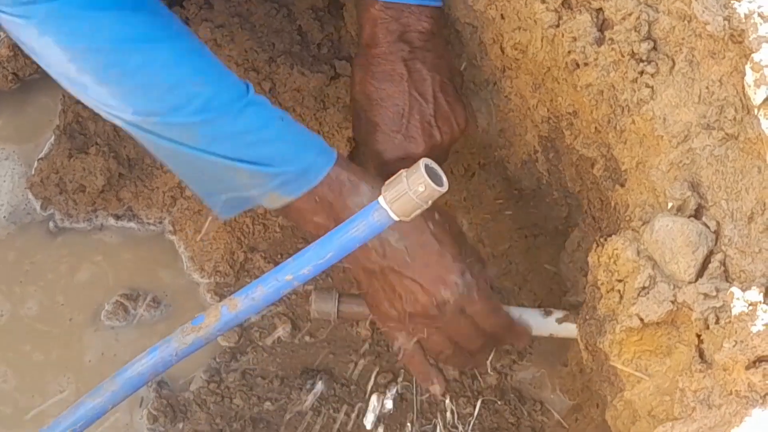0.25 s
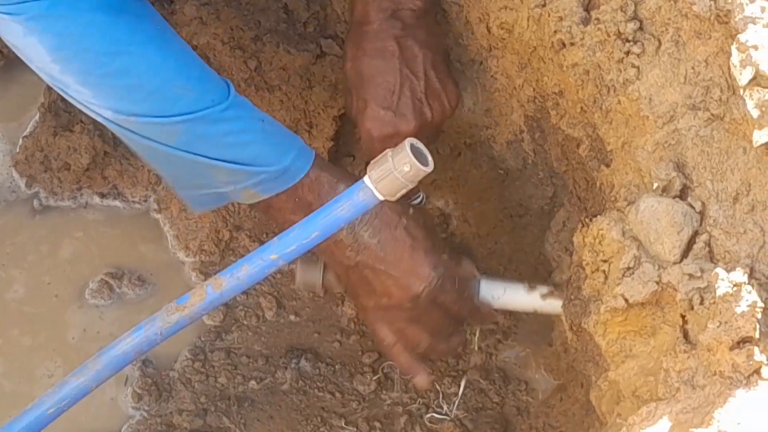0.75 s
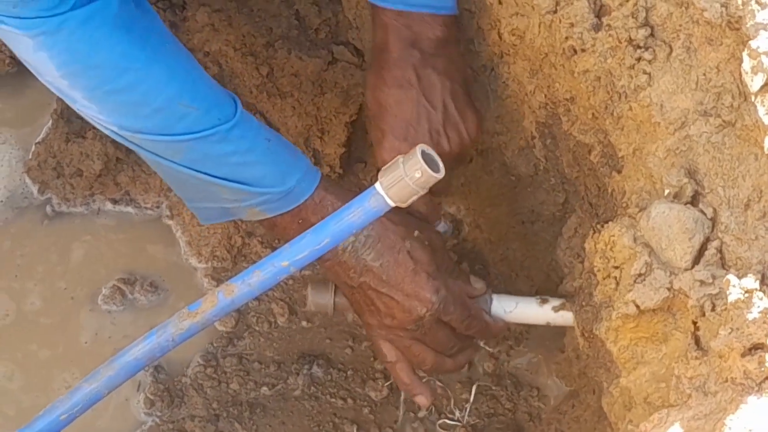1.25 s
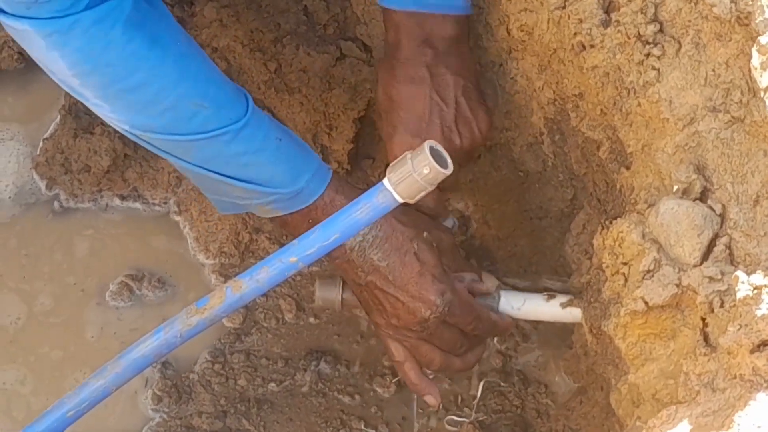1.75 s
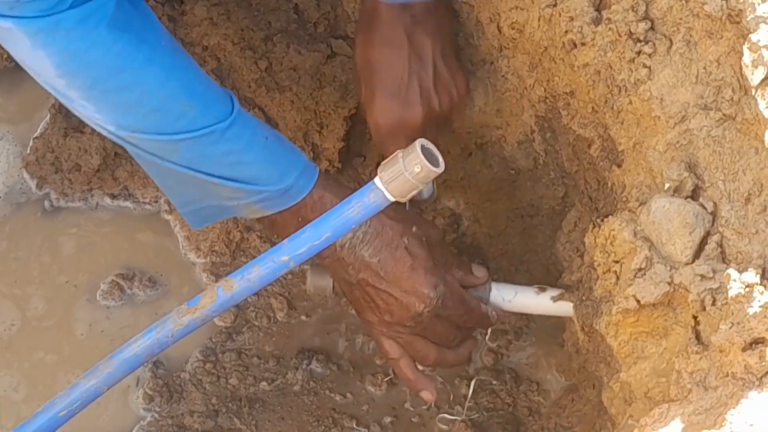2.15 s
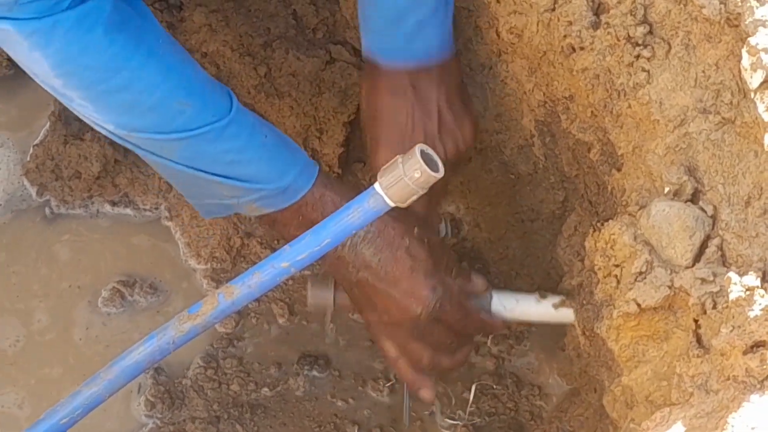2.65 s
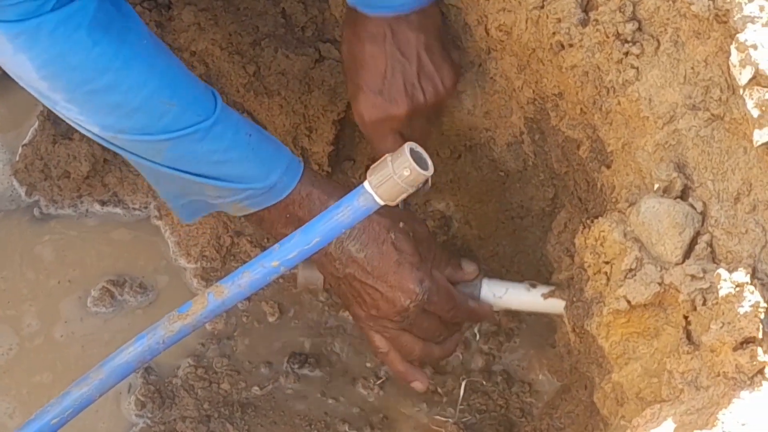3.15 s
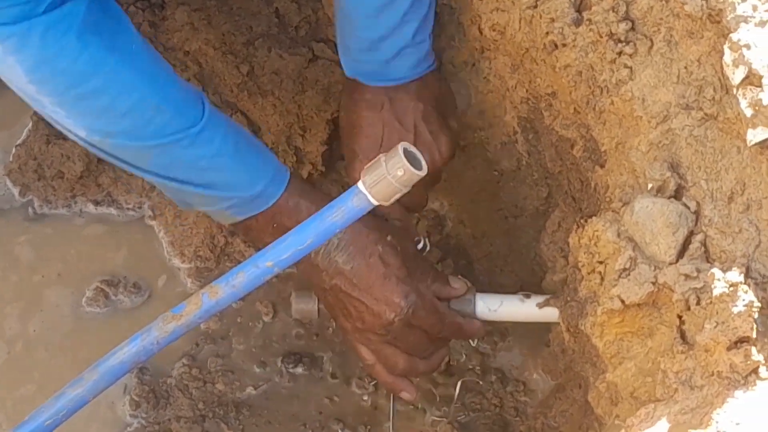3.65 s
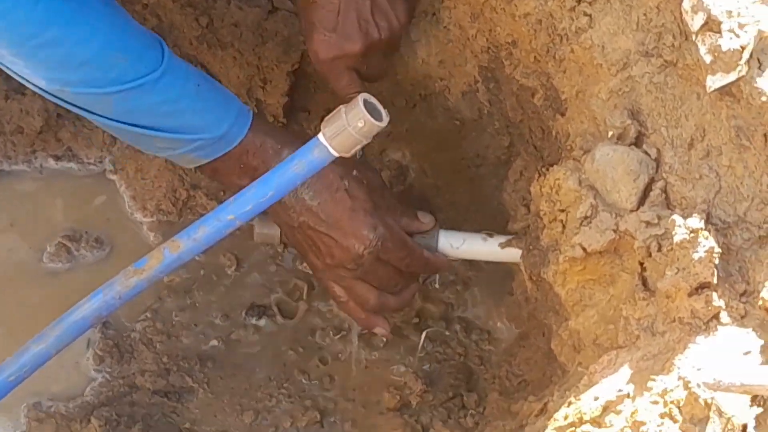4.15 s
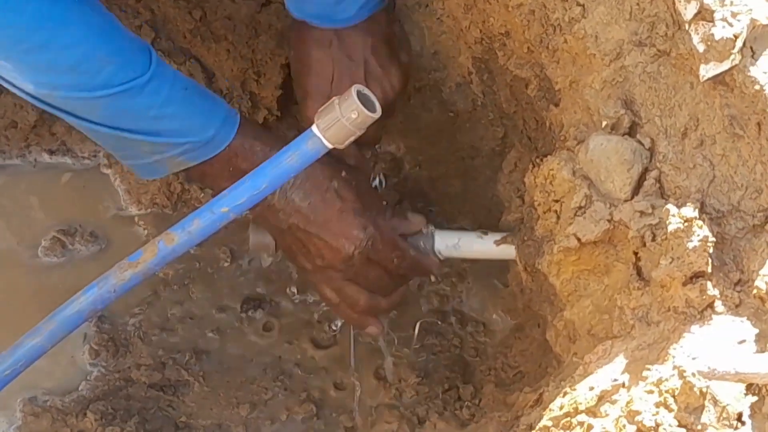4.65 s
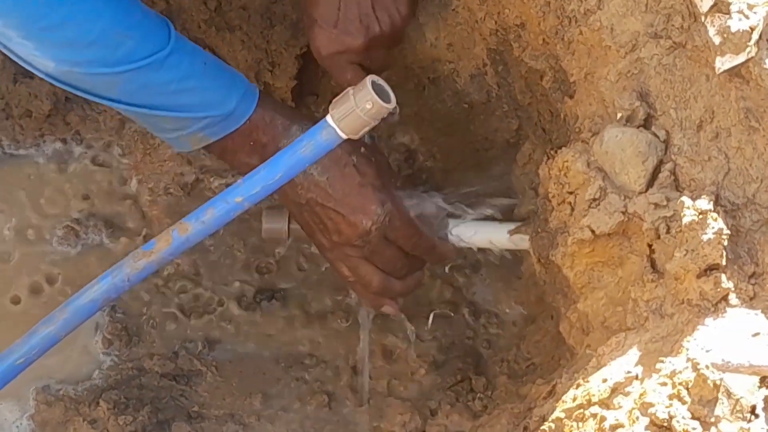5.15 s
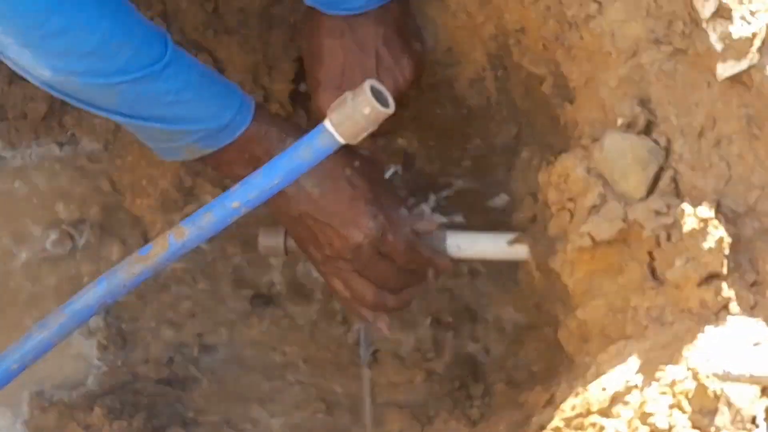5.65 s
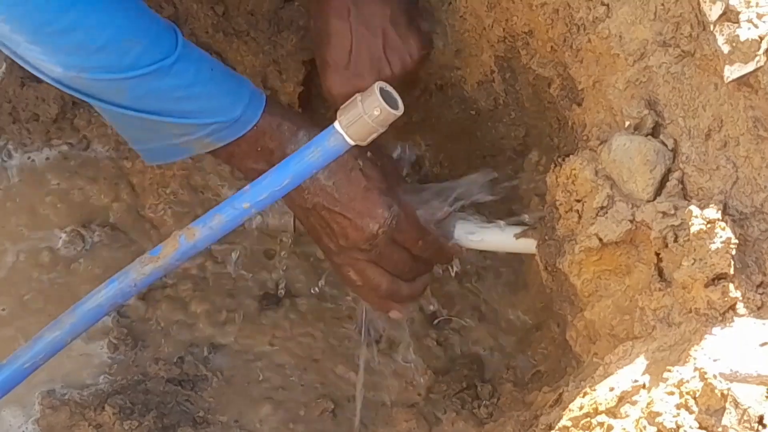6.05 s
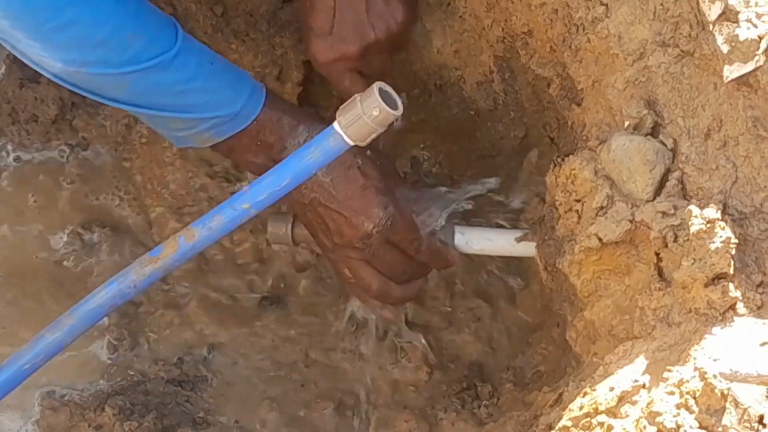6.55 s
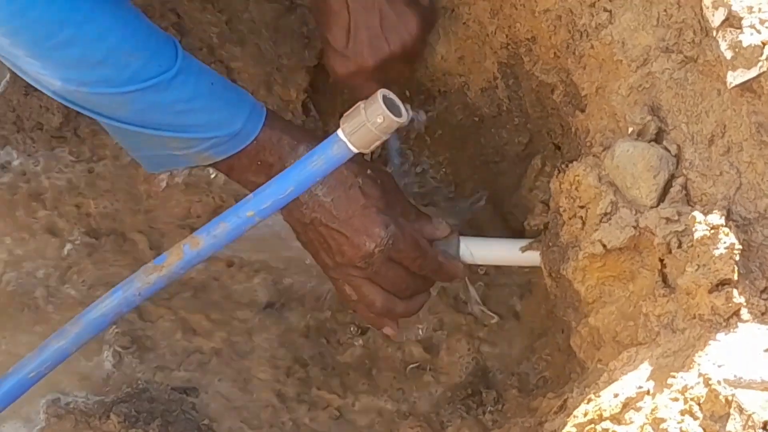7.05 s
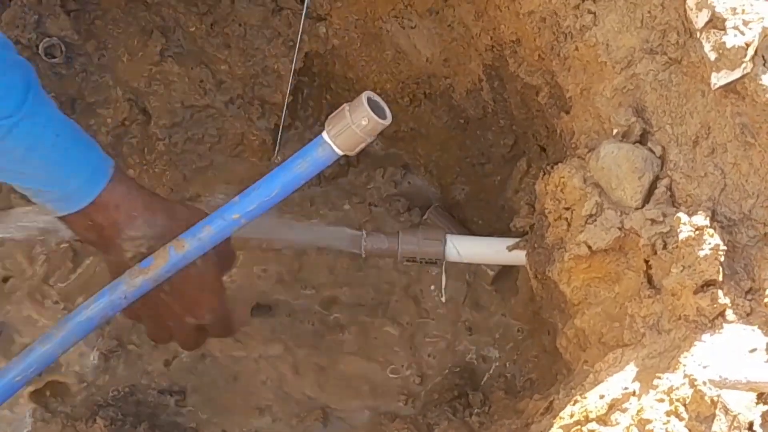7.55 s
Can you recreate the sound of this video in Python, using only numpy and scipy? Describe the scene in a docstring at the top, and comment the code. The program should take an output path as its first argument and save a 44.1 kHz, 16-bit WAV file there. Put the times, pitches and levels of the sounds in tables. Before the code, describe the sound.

Short scratchy saw strokes on a hollow plastic pipe give way to hissing, pattering water, with low wind thumps on the microphone.

```python
"""A muddy pit with earth walls: a bare hacksaw blade cuts a plastic water pipe, its leaking end held by hand.
Short nicks start the cut, then push and pull strokes excite the pipe's resonances and rasp as noise.
Once the blade breaks through, noise bursts and bubbles make spray, patter and run-off; wet teeth are quieter.
At last the hand lets go and a jet splashes into the puddle. Gusts of low noise buffet the microphone's
left port, later mostly its right. Levels in the tables are relative, ahead of the trims in scene()."""
import sys
import numpy as np
from scipy import signal
from scipy.fft import rfft, irfft
from scipy.io import wavfile
from scipy.ndimage import uniform_filter1d

SR = 44100
rng = np.random.default_rng(int(sys.argv[2]) if len(sys.argv) > 2 else 0)


def digitize_waveform(pressure):
    """Quantize a signal to 16-bit integers and store it at the path in sys.argv[1].

    Rows of a 2-D input are taken as channels; values are limited to [-1, 1].
    """
    field = np.atleast_2d(pressure).T
    bounded = np.clip(field, -1, 1)
    quanta = np.round(bounded * 32767).astype(np.int16)
    wavfile.write(sys.argv[1], SR, quanta)


N = 344862  # samples

# bending modes of the water-filled pipe: pitch_hz, width_hz, level_db
PIPE_BENDING_MODES = [(356, 39, 0.5), (474, 31.5, 2.5), (584.4, 36, 3.5), (718, 24.7, 2), (832, 55, 1),
                      (1007, 69, 3), (1127, 60, 3.5), (1339, 121, 0)]
# wall modes of the pipe: pitch_hz, width_hz, level_db
PIPE_WALL_MODES = [(1860, 102, 2), (2356, 102, 9.5), (2873, 186, 4.5), (3750, 380, -1.5)]
# spectrum of the rasp: frequency_hz, level_db
RASP_SPECTRUM = [(1500, -47), (3200, 1.5), (4200, 1), (5500, 4.5), (7000, -1.5), (8400, 4), (9800, -1),
                 (15500, -3.5)]


def saw(body_db, bite_db, chip_s, brighten_db, dulling_db):
    """Each tooth bends the pipe, then tears a chip that rings the wall and rasps."""
    out = np.zeros((2, N))
    soft = signal.butter(3, 1500, fs=SR, output="sos")
    for start_s, length_s, attack, rate, speedup, rough, body, bite, rasp in cuts():
        # a smooth stroke skips evenly from tooth to tooth, a rough one catches at random
        catches, pressure = teeth(length_s, attack, rate, speedup, jitter=0.191 * rough,
                                  uneven_db=5.05 * np.sqrt(rough), chatter_db=1.5, release_s=0.0042)
        size = len(catches)
        progress = np.minimum(np.arange(size) / SR / length_s, 1)

        # a slow blade pushes longer on each tooth, so it favours the low modes
        slant = brighten_db * np.log2(rate / 500)
        modes = [(hz, width, db + slant * np.log2(hz / 800)) for hz, width, db in PIPE_BENDING_MODES]
        scrape = rough * unit(pair(0.82, size) * pressure)
        bend = signal.sosfilt(soft, shifting(unit(catches) + scrape, modes, progress))

        # a rough stroke tears hardest at first, before chips clog the teeth
        chips = catches * undb(dulling_db * rough ** 2 * progress)
        tearing = fade(chips, chip_s)
        wall_drive = unit(chips) + unit(tearing * pair(0.6, size))
        wall = shifting(wall_drive, PIPE_WALL_MODES, progress)
        rasping = colour(tearing * pair(0.17, size), RASP_SPECTRUM)

        stroke = unit(bend) * undb(body + body_db)
        stroke = stroke + unit(wall) * undb(bite + bite_db)
        stroke = stroke + unit(rasping) * undb(rasp)
        # levels hold for the length of the stroke, not for the longer buffer
        add(out, start_s, stroke * np.sqrt(length_s * SR / size))
    return out


PUSH, PULL = 1, -1
# blade strokes; a push that snags goes on in a second row:
# start_s, length_s, strength_db, rate_teeth_per_s, direction
BLADE_STROKES = [(1.784, 0.038, -41, 500, PUSH), (1.929, 0.056, -35, 700, PULL),
                 (2.107, 0.066, -37.5, 510, PUSH), (2.261, 0.063, -37, 620, PULL),
                 (2.436, 0.078, -39, 554, PUSH), (2.574, 0.078, -38, 574, PULL),
                 (2.768, 0.065, -36, 580, PUSH), (2.914, 0.067, -31, 630, PULL),
                 (3.107, 0.015, -24.5, 635, PUSH), (3.124, 0.019, -30.5, 600, PUSH),
                 (3.158, 0.016, -30.5, 530, PUSH), (3.237, 0.049, -30, 558, PULL),
                 (3.411, 0.0069, -27.5, 500, PUSH), (3.435, 0.024, -24, 520, PUSH),
                 (3.461, 0.039, -33.5, 570, PUSH), (3.563, 0.066, -29.5, 622, PULL),
                 (3.743, 0.06, -31.5, 410, PUSH), (3.806, 0.02, -34.5, 530, PUSH),
                 (3.885, 0.05, -27, 630, PULL), (4.054, 0.043, -28.5, 466, PUSH),
                 (4.111, 0.022, -29, 534, PUSH), (4.208, 0.056, -35.5, 570, PULL),
                 (4.379, 0.078, -33.5, 490, PUSH), (4.514, 0.048, -27.5, 650, PULL),
                 (4.716, 0.044, -33, 405, PUSH), (4.852, 0.043, -40, 575, PULL),
                 (5.031, 0.069, -36, 415, PUSH), (5.177, 0.055, -35.5, 540, PULL),
                 (5.341, 0.072, -33.5, 350, PUSH), (5.538, 0.033, -47.5, 340, PULL),
                 (5.705, 0.076, -40.5, 377, PUSH), (5.912, 0.031, -42.5, 470, PULL),
                 (6.424, 0.049, -42, 340, PUSH)]
# the tooth tips skip on the pipe and nick it: start_s, length_s, scratch_db, knock_db (on the pipe)
TOOTH_NICKS = [(0.384, 0.064, -55.5, -50), (0.524, 0.019, -49.5, -50), (0.675, 0.0083, -51.5, -41.5),
               (0.742, 0.017, -44, -33.5), (0.874, 0.011, -49, -68), (0.978, 0.007, -40.5, -70),
               (1.102, 0.0043, -41.5, -52), (1.247, 0.014, -45, -45.5), (1.434, 0.0065, -43.5, -46.5),
               (1.638, 0.0073, -49, -43.5), (2.009, 0.013, -49, -45), (2.192, 0.0079, -51.5, -41),
               (2.686, 0.0083, -41, -50.5), (2.826, 0.004, -34.5, -31), (3.002, 0.0087, -42.5, -38),
               (3.087, 0.0026, -43, -25), (3.224, 0.0042, -40, -47), (3.311, 0.014, -40, -42.5),
               (3.381, 0.0049, -39.5, -57), (4.69, 0.018, -53, -40), (5.157, 0.0067, -32.5, -45)]
# pulls run more evenly once the kerf guides them, then less so: time_s, roughness (0-1)
PULL_ROUGHNESS_CURVE = [(2.6, .85), (3.5, .37), (4.5, .4), (5.3, .7)]
BREAKTHROUGH_S, FLOOD_S = 4.205, 0.23  # the blade reaches the water, which then fills the kerf
# share by which the blade gains speed over a stroke; share of a push's roughness that water takes away
PUSH_SPEEDUP, PULL_SPEEDUP, WET_SMOOTHING = .12, .34, .2
# share of a stroke over which pressure builds: a push bites at once, a pull swells
PUSH_ATTACK, PULL_ATTACK, NICK_ATTACK = 0.051, 0.08, 0.38
# ring of the pipe wall, against the stroke's strength
BITE_DB, PUSH_BITE_DB, WET_BITE_DB = -8.5, 3, -6.5
# rasp of a stroke of usual strength, and its growth in dB per dB of strength
USUAL_DB, RASP_DB, RASP_GROWTH, PUSH_RASP_DB, WET_RASP_DB = -33.5, -41, 0.64, 2, -8.5
NICK_TEETH_PER_S, NICK_BITE_DB = 500, -3.5


def cuts():
    """Every touch of the blade: pushes bite harder, pulls gain more speed, wet teeth are quieter.
    Yields start_s, length_s, attack, teeth per second, speed-up, roughness, body_db, bite_db, rasp_db."""
    for start_s, length_s, db, rate, direction in BLADE_STROKES:
        wet = np.clip((start_s - BREAKTHROUGH_S) / FLOOD_S, 0, 1)
        bite = db + BITE_DB + PUSH_BITE_DB * direction + WET_BITE_DB * wet
        rasp = RASP_DB + RASP_GROWTH * (db - USUAL_DB) + PUSH_RASP_DB * direction + WET_RASP_DB * wet
        if direction == PUSH:
            attack, speedup, rough = PUSH_ATTACK, PUSH_SPEEDUP, 1 - WET_SMOOTHING * wet
        else:
            attack, speedup = PULL_ATTACK, PULL_SPEEDUP
            rough = np.interp(start_s, *np.transpose(PULL_ROUGHNESS_CURVE))
        yield start_s, length_s, attack, rate, speedup, rough, db, bite, rasp
    for start_s, length_s, scratch, knock in TOOTH_NICKS:
        bite = scratch + NICK_BITE_DB + 0.37 * (knock - scratch)
        yield start_s, length_s, NICK_ATTACK, NICK_TEETH_PER_S, 0, 1, knock, bite, scratch


SEATING_S = .003  # time that the teeth need to seat themselves, however short the touch


def teeth(length_s, attack, rate, speedup, jitter, uneven_db, chatter_db, release_s):
    """The blade gathers speed and its teeth catch unevenly; returns the catches and the blade's pressure."""
    t = np.arange(SR // 5) / SR
    chance = rng.standard_normal((160, 2))
    speed = rate * (1 + speedup * (np.minimum(t / length_s, 1) - .5))
    teeth_passed = np.cumsum(speed) / SR
    tooth_places = np.cumsum(np.exp(jitter * chance[:, 0])) - 1
    at = np.searchsorted(teeth_passed, tooth_places)
    catches = np.bincount(at, undb(uneven_db * chance[:, 1]), len(t) + 1)[:len(t)]
    rise = np.minimum(t / (SEATING_S + attack * length_s), 1)
    fall = np.exp(-np.maximum(t - length_s * 0.95, 0) / (release_s + 0.11 * length_s))
    # the thin blade chatters in the kerf
    pressure = rise * fall * undb(chatter_db * walk(103.4, len(t)))
    return catches * pressure, pressure


# each spot on the wall favours other modes, and the hand's changing grip detunes them by a small share
STROKE_COLOUR_DB, GRIP_DETUNE = 2.8, .014


def shifting(x, modes, progress):
    """The teeth travel across the wall, so other modes ring most at the end of a stroke than at its start."""
    out = 0
    for share in (1 - progress, progress):
        grip = 1 + GRIP_DETUNE * rng.standard_normal()
        spot = [(hz * grip, width, db + STROKE_COLOUR_DB * rng.standard_normal()) for hz, width, db in modes]
        out = out + ring(x * share, spot)
    return out


# spectra of spray, of a pinhole leak, of droplets on mud and of the puddle: frequency_hz, level_db
MIST_SPECTRUM = [(2500, -6), (5000, -3.5), (7000, 3), (10000, 3), (15500, 3)]
PINHOLE_SPECTRUM = [(5000, -15), (8500, -34), (11000, 4), (15500, 9)]
PATTER_SPECTRUM = [(700, -2), (1250, -13), (2050, 1), (3100, 0.5), (5400, 6), (6600, 3.5), (9000, -10)]
GURGLE_SPECTRUM = [(200, 0.5), (320, 0.5), (470, 2), (614, 4.5), (880, -1.5), (1110, 2), (1270, -2.5),
                   (1520, 1), (2500, -15)]
# the cut pipe rings under the spray: pitch_hz, width_hz, level_db
SPRAY_RING_MODES = [(2020, 130, -3.5), (2360, 99, -4)]
FIZZ, GLUG = .85, .8  # bubbles against the plain splashing, in the patter and in the puddle
# unevenness of the droplets in mist and fine patter, and of the coarse jet's flow
MIST_SPREAD_DB, PATTER_SPREAD_DB, SPUTTER_DB = 3.6, 6.5, 3
FULL_FLOW_DB = -44.5  # reference flow: mist below this hisses higher


def water(mist_db, patter_db, gurgle_db):
    """Spray hisses at the kerf, its droplets patter on wet mud and the run-off churns the puddle."""
    mist, patter, gurgle = outflow()
    # where there is little mist the water comes as a solid jet: fewer, fatter drops that trap bubbles
    coarse = np.clip(0.21 + (patter - mist) / 10, 0, 1)
    sputter = SPUTTER_DB * coarse * walk(35)  # a coarse jet breaks up, fine spray is steady

    spray = impacts(rate=6000, spread_db=MIST_SPREAD_DB, smear_s=0.0014, likeness=0.035)
    thin = np.clip((FULL_FLOW_DB - mist) / 20, 0, 1)  # a small leak hisses higher
    hiss = unit(colour(spray, MIST_SPECTRUM)) + 0.73 * thin * unit(colour(pair(0), PINHOLE_SPECTRUM))
    hiss_level = mist + mist_db + sputter / 2 + 5.1 * thin * walk(26.8)

    fine = impacts(rate=16000, spread_db=PATTER_SPREAD_DB, smear_s=0.0034, likeness=0.84)
    fat = impacts(rate=760, spread_db=8.5, smear_s=0.016, likeness=0.11)
    fat = fat + FIZZ * bubbles(1390, 6040, cycles=34, spread_db=3.0, count=5600)
    splats = colour(np.sqrt(1 - coarse) * fine + np.sqrt(coarse) * unit(fat), PATTER_SPECTRUM)
    splats = splats + sum(ring(splats, [mode]) for mode in SPRAY_RING_MODES)

    churn = impacts(rate=900, spread_db=4.0, smear_s=0.0035, likeness=0.064)
    glugs = bubbles(311, 1740, cycles=14.4, spread_db=4.5, count=3600)
    puddle = colour(churn + GLUG * coarse * glugs, GURGLE_SPECTRUM)

    return (hiss * undb(hiss_level) + unit(splats) * undb(patter + patter_db + sputter)
            + unit(puddle) * undb(gurgle + gurgle_db))


# flow of the leak: time_s, level_db
LEAK_FLOW = [(0.0, -65.5), (0.63, -60.5), (0.94, -61.5), (1.41, -56.5), (2.46, -56), (2.94, -60),
             (3.61, -55.5), (4.31, -55.5), (4.55, -50.5), (4.75, -46), (5.05, -42.5), (5.8, -37),
             (6.34, -37.5), (7.03, -45.5), (7.82, -48.5)]
# the flow of water surges or falters for a moment: start_s, length_s, change_db
FLOW_SURGES = [(0.116, 0.14, 9.5), (1.264, 0.16, 5), (1.852, 0.078, -8), (4.882, 0.16, 2.5),
               (6.657, 0.12, 5.5), (6.918, 0.045, 6), (7.135, 0.026, -10), (7.44, 0.076, 4.5),
               (7.682, 0.022, -11), (7.712, 0.029, 3.5), (7.787, 0.029, 6.5)]
MIST_GROWTH, GURGLE_GROWTH = 0.97, 0.28  # mist and gurgle grow more slowly than the flow, in dB per dB
SURGE_PATTER = 0.77  # a surge is mostly mist; this share of its change in dB reaches the ground
LOOSEN_S, LULL_DB = 7.07, -15  # the grip loosens and less run-off reaches the puddle
RELEASE_S, JET_PATTER_DB, JET_MIST_DB = 7.17, 3, -2.5  # the hand lets go: the jet hits mud, with less mist
JET_LANDS_S, JET_SPLASH_DB, JET_GURGLE_DB = 7.46, 1.5, -3.5  # the jet reaches the puddle


def outflow():
    """Levels of mist, patter and gurgle in dB: all follow the flow, and the free jet patters harder."""
    flow = np.interp(np.arange(N) / SR, *np.transpose(LEAK_FLOW))
    surge = sum(db * swell(start_s, length_s, attack_s=0.013, release_s=0.0033)
                for start_s, length_s, db in FLOW_SURGES)
    loose, jet, landed = (swell(start_s, N / SR, attack_s=0.0044, release_s=.03)
                          for start_s in (LOOSEN_S, RELEASE_S, JET_LANDS_S))
    mist = FULL_FLOW_DB + MIST_GROWTH * (flow - FULL_FLOW_DB) + surge + JET_MIST_DB * jet
    patter = flow + SURGE_PATTER * surge + JET_PATTER_DB * jet + JET_SPLASH_DB * landed
    gurgle = FULL_FLOW_DB + GURGLE_GROWTH * (flow - FULL_FLOW_DB)
    gurgle = gurgle + JET_GURGLE_DB * landed + LULL_DB * (loose - landed)
    return mist, patter, gurgle


def wander(x, rate, depth_db):
    """Each third of an octave of the water noise swells and fades at random."""
    spectrum = rfft(x)
    thirds = 3 * np.log2(np.clip(np.fft.rfftfreq(N, 1 / SR), 250, 16000) / 250)
    out = 0
    for k in range(int(thirds[-1]) + 1):
        band = irfft(spectrum * np.maximum(1 - np.abs(thirds - k), 0), N)
        out = out + band * undb(depth_db * walk(rate))
    return out


BUBBLE_RISE = .07  # share by which a bubble's pitch rises


def bubble(hz, cycles, glide):
    """A trapped bubble rings and rises in pitch as it nears the surface."""
    age = np.arange(int(SR * cycles / hz) + 2) * hz / SR / cycles  # 0 to 1
    return np.sin(2 * np.pi * cycles * age * (1 + glide * age / 2)) * np.exp(-np.log(100) * age)


def bubbles(low_hz, high_hz, cycles, spread_db, count):
    """A swarm of bubbles at random times, pitches and strengths."""
    out = np.zeros(N)
    for when, pitch, size in rng.random((count, 3)):
        hz = low_hz * (high_hz / low_hz) ** pitch
        gain = undb(-spread_db * np.log(size + 0.046))
        add(out, when * N / SR, gain * bubble(hz, cycles, BUBBLE_RISE))
    return unit(out)


# single fat drops, and one low knock at 0.381 s: start_s, level_db, pitch_hz (of the ringing)
DROPS_AND_KNOCK = [(0.184, -43, 2830), (0.381, -44, 377), (0.384, -46, 1860), (.569, -44, 3370),
                   (0.934, -54, 1220), (6.748, -35, 4050), (7.004, -48.5, 540), (7.007, -44, 2410),
                   (7.05, -35, 4670), (7.18, -40, 2330), (7.312, -29.5, 5250), (7.417, -39, 2760),
                   (7.455, -32, 4270), (7.504, -32, 4650), (7.528, -37, 620), (7.555, -44, 2000),
                   (7.602, -41.5, 446), (7.633, -40, 1920), (7.649, -39, 1110), (7.727, -37.5, 716),
                   (7.733, -37, 2090)]
DROP_RING_S = .034  # how long a 1500 Hz ringing lasts


def drops(level_db, slap, slap_s):
    """A fat drop slaps the puddle and traps a bubble, lower ones sound longer; the low knock is made alike."""
    out, t = np.zeros(N), np.arange(SR // 20) / SR
    for start_s, db, hz in DROPS_AND_KNOCK:
        gain, stretch = undb(db + level_db), np.sqrt(1500 / hz)
        splash = unit(ring(rng.standard_normal(len(t)), [(hz, hz, 0)]))
        add(out, start_s, gain * slap * splash * np.exp(-t / (slap_s * stretch)))
        add(out, start_s, gain * bubble(hz, hz * DROP_RING_S * stretch, BUBBLE_RISE / 2))
    return out


# sharp spits from the gap: start_s, level_db
GAP_SPITS = [(4.93, -29), (5.03, -32), (5.108, -29.5), (5.218, -26.5), (5.42, -29), (7.122, -31.5),
             (7.282, -32)]


def spits(level_db, decay_s):
    """Water spits through the narrow gap in sharp, high ticks of noise."""
    out, t = np.zeros((2, N)), np.arange(SR // 30) / SR
    high = signal.butter(2, 7000, "high", fs=SR, output="sos")
    for start_s, db in GAP_SPITS:
        tick = signal.sosfilt(high, pair(0, len(t)) * np.exp(-t / decay_s))
        add(out, start_s, undb(db + level_db) * tick)
    return out


def squirt(start_s, db, decay_s, hz, width_hz):
    """As the palm closes on the open end, water rings the gap and sloshes in the cupped hand."""
    t = np.arange(SR // 3) / SR
    gap = unit(ring(pair(0.17, len(t)), [(hz, width_hz, 0), (1830, 160, -1), (2440, 200, -4)]))
    palm = unit(ring(pair(0.48, len(t)), [(395, 230, -11.5), (870, 160, -15.0), (1270, 64, -5)]))
    slosh = palm * (1 - np.exp(-t / 0.019))
    muffled = signal.sosfilt(signal.butter(4, 2700, fs=SR, output="sos"), gap + slosh)
    out = np.zeros((2, N))
    add(out, start_s, muffled * undb(db) * np.exp(-t / decay_s))
    return out


# spectra of the wind's rumble and of its sharper buffets: frequency_hz, level_db
RUMBLE_SPECTRUM = [(25, -13.5), (62, 1), (120, -5.5), (250, -26), (1200, -86)]
BUFFET_SPECTRUM = [(45, -1), (190, 8), (330, -1.5), (550, -17.5), (900, -25), (3000, -102)]
FLUTTER_DB, FLUTTER_PER_S = 2.6, 36
GUST_SPAN_S = 0.5  # wind strength averaged over this span tells lasting gusts from short ones


def wind(level_db, buffet_db, eddy_db, ceiling_db):
    """Eddies rumble on each port separately; strong, lasting gusts add buffets, and tanh rounds off peaks."""
    strength = air()
    lasting = uniform_filter1d(strength, int(GUST_SPAN_S * SR))
    rumble = unit(colour(pair(0), RUMBLE_SPECTRUM))
    slams = impacts(rate=150, spread_db=0.7, smear_s=0.0049, likeness=0)
    buffets = unit(colour(slams, BUFFET_SPECTRUM)) * undb(buffet_db) * lasting / undb(-20.0)
    unrest = undb(level_db + eddy_db * walk(13) + FLUTTER_DB * walk(FLUTTER_PER_S))
    pressure = strength * unrest * (rumble + buffets)
    return undb(ceiling_db) * np.tanh(pressure / undb(ceiling_db))


# gusts at the microphone: start_s, length_s, level_db, left_minus_right_db
WIND_GUSTS = [(-.02, 0.073, -39.5, 30), (0.237, 0.073, -34, 42), (0.404, 0.036, -41.5, 16),
              (0.586, 0.041, -45.5, 25), (1.479, 0.05, -50.5, 19), (1.793, 0.13, -44, 26),
              (2.051, 0.062, -41, 22), (2.239, 0.022, -33.5, 31), (2.375, .17, -45, 12),
              (2.97, 0.3, -36, 38), (3.287, 0.21, -30, 24), (3.46, 0.42, -27.5, 22.5),
              (3.947, 0.16, -26.5, 19), (4.167, 0.092, -43.5, -10), (4.393, 0.23, -52.5, -29),
              (4.95, 0.11, -49.5, -3), (6.074, 0.048, -44, -19), (6.34, 0.1, -38, -3),
              (6.485, 0.2, -42, -4), (6.8, 0.09, -51, -32), (7.245, 0.077, -52.5, -31)]
BREEZE_DB, BREEZE_DB_PER_S = -56, -1.5  # the light air between gusts dies down
GUST_ATTACK_S, GUST_RELEASE_S = 0.0125, 0.042


def air():
    """Strength of the wind at the left and right port: the powers of gusts add to a light breeze."""
    power = undb(BREEZE_DB + BREEZE_DB_PER_S * np.arange(N) / SR + 0.88 * walk(4.85)) ** 2
    for start_s, length_s, db, side_db in WIND_GUSTS:
        side_power = np.array([[undb(side_db)], [1]]) ** 2
        gust = undb(db) * swell(start_s, length_s, GUST_ATTACK_S, GUST_RELEASE_S)
        power = power + 2 * side_power / np.sum(side_power) * gust ** 2
    return np.sqrt(2 * power)


# single hard eddies: start_s, level_db (peak), upper_edge_hz
HARD_EDDIES = [(.312, -13, 118), (3.161, -12, 367), (3.303, -19, 336), (3.574, -12, 375), (3.635, -15, 600),
               (3.758, -11.5, 610), (3.844, -14.5, 586), (3.876, -5.5, 610), (3.966, -7.5, 364),
               (4.073, -5, 260), (4.283, -20, 303)]


def thumps(level_db, decay_s, right_db):
    """Single hard eddies slam into the left port; the right one gets only a little of each."""
    out, t = np.zeros((2, N)), np.arange(SR // 10) / SR
    for start_s, db, edge_hz in HARD_EDDIES:
        band = signal.butter(3, [70, edge_hz], "band", fs=SR, output="sos")
        eddy = signal.sosfilt(band, pair(0, len(t)) * np.exp(-t / decay_s))
        eddy = eddy / np.abs(eddy).max(axis=1, keepdims=True)
        add(out, start_s, eddy * undb(db + level_db + np.array([[0], [right_db]])))
    return out


def impacts(rate, spread_db, smear_s, likeness):
    """Random short bursts of noise, a few much harder than the rest."""
    chance, size = rng.random(N), np.minimum(rng.exponential(size=N), 5)
    power = fade((chance < rate / SR) * undb(spread_db * size) ** 2, smear_s)
    return unit(np.sqrt(power) * pair(likeness))


def ring(x, modes):
    """Drive damped resonances; neighbours swing in opposite phase."""
    out = 0
    for k, (hz, width, db) in enumerate(modes):
        out = out + (-1) ** k * undb(db) * signal.lfilter(*signal.iirpeak(hz, hz / width, fs=SR), x)
    return out


def response(points, size):
    """Gain of (Hz, dB) points at the bins of a transform, joined over log frequency."""
    hz, db = np.transpose(points)
    return undb(np.interp(np.log(np.fft.rfftfreq(size, 1 / SR) + 1), np.log(hz), db))


def colour(x, points):
    """Shape a sound with a spectrum."""
    return irfft(rfft(x) * response(points, x.shape[-1]), x.shape[-1])


def pair(likeness, size=N):
    """Noise for the left and right port, of which the given share of power is common to both."""
    noise = rng.standard_normal((3, size))
    return np.sqrt(likeness) * noise[0] + np.sqrt(1 - likeness) * noise[1:]


def walk(rate, size=N):
    """Random levels, a new one every 1 / rate s, joined by straight slews; spread near 1."""
    k = max(int(SR / rate), 1)
    return uniform_filter1d(np.repeat(rng.standard_normal(size // k + 1), k), k)[:size]


def swell(start_s, length_s, attack_s, release_s):
    """An envelope that rises at a time, holds and dies away."""
    age = np.arange(N) / SR - start_s
    return np.clip(age / attack_s, 0, 1) * np.exp(-np.clip((age - length_s) / release_s, 0, 20))


def fade(x, seconds):
    """Let every impulse die away exponentially."""
    return signal.lfilter([1], [1, -np.exp(-1 / (seconds * SR))], x)


def undb(db):
    """Decibels to gain."""
    return 10 ** (np.asarray(db) / 20)


def unit(x):
    """Scale to rms 1."""
    return x / np.sqrt(np.mean(x ** 2) + 1e-20)


def add(track, start_s, sound):
    """Mix a sound into a track at a time."""
    i = max(int(start_s * SR), 0)
    part = track[..., i:i + sound.shape[-1]]
    part += sound[..., :part.shape[-1]]


def ports(x, lag_ms, sides):
    """Two microphone ports: sound reaches the right one first and a little louder."""
    delay = np.exp(-2j * np.pi * np.fft.rfftfreq(N, 1 / SR) * lag_ms / 1000)
    tilt = response(sides, N)  # left against right
    both = np.array([tilt * delay, np.ones(len(tilt))]) * np.sqrt(2 / (1 + tilt ** 2))
    return irfft(rfft(x) * both, N)


# the right port hears pipe and water a little louder: frequency_hz, left_minus_right_db
SAW_SIDES = [(300, -3.5), (1300, -4), (2350, -10), (4400, -2.5)]
WATER_SIDES = [(2350, -2.5), (4400, -1)]


def scene():
    """Saw and water in the pit, wind at the microphone."""
    blade = saw(body_db=-1.0, bite_db=0.5, chip_s=0.004, brighten_db=13, dulling_db=-2.5)
    leak = wander(water(mist_db=-0.5, patter_db=-1.0, gurgle_db=-8.0), rate=15, depth_db=1.44)
    leak = leak + drops(level_db=2.0, slap=0.37, slap_s=0.02)
    leak = leak + spits(level_db=0.5, decay_s=0.004)
    leak = leak + squirt(start_s=.114, db=-42.5, decay_s=0.074, hz=2050, width_hz=81)
    gusts = wind(level_db=1.5, buffet_db=-3.0, eddy_db=0.5, ceiling_db=13.0)
    gusts = gusts + thumps(level_db=-4.0, decay_s=0.0061, right_db=-31)
    pit = ports(blade, lag_ms=0.083, sides=SAW_SIDES) + ports(leak, lag_ms=0.062, sides=WATER_SIDES)
    return pit + gusts


def record(dry):
    """The recorder cuts the deepest rumble and the top."""
    dry = signal.sosfilt(signal.butter(4, 46, "high", fs=SR, output="sos"), dry)
    return signal.sosfilt(signal.ellip(10, .2, 80, 15850, fs=SR, output="sos"), dry)


dry = scene()
out = record(dry)
digitize_waveform(out)
```